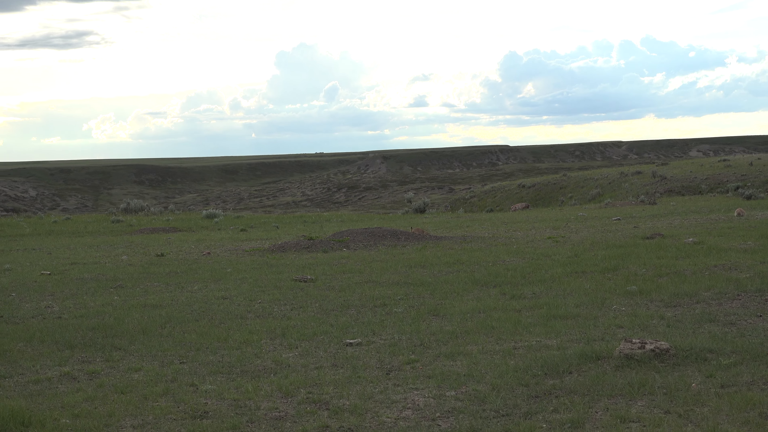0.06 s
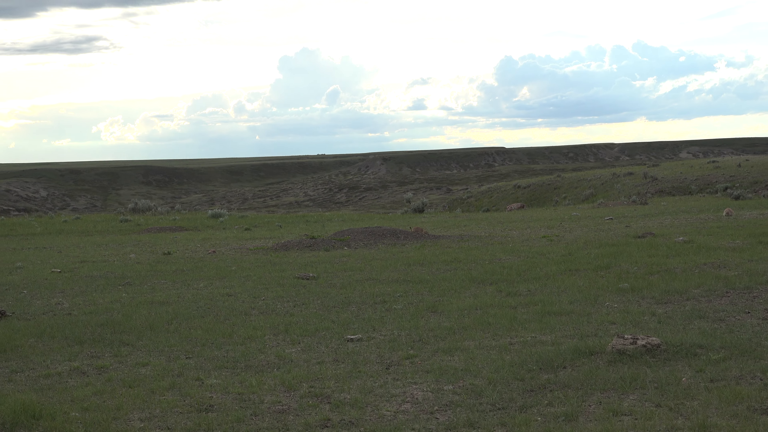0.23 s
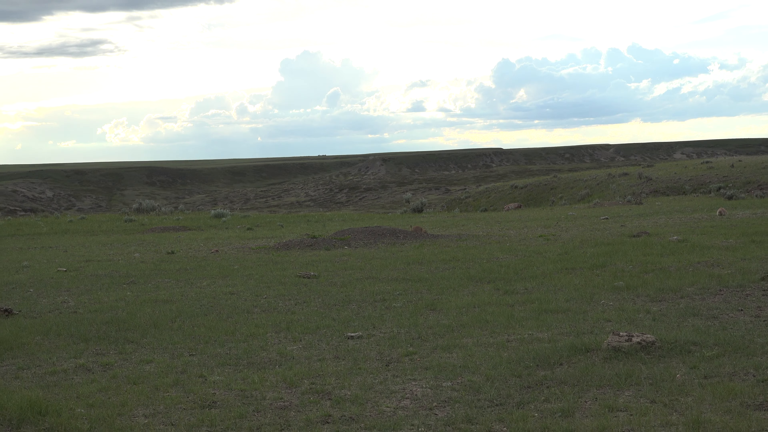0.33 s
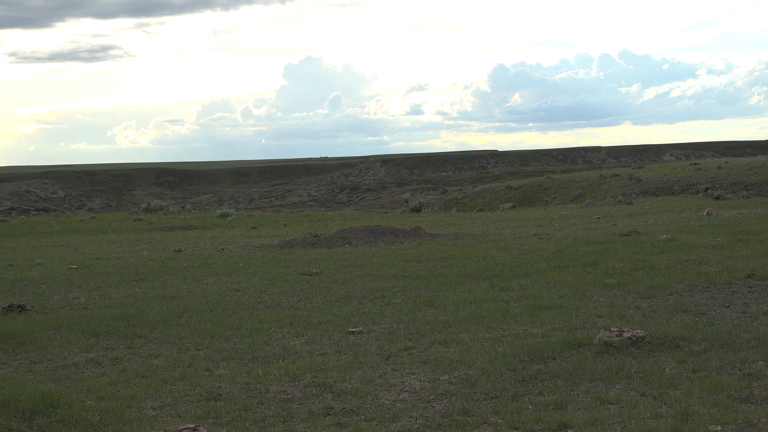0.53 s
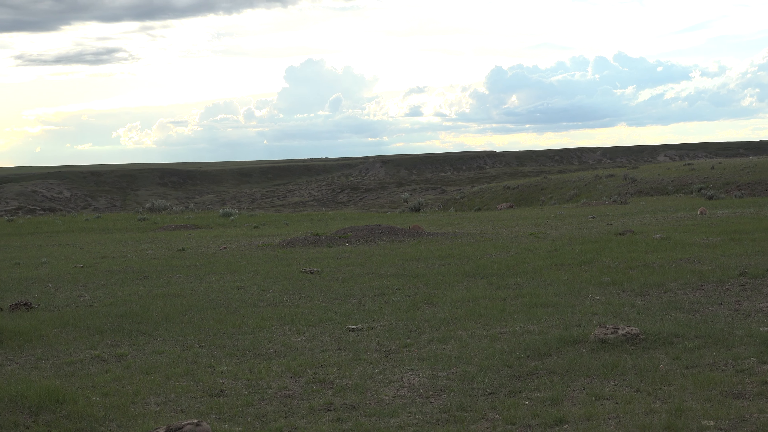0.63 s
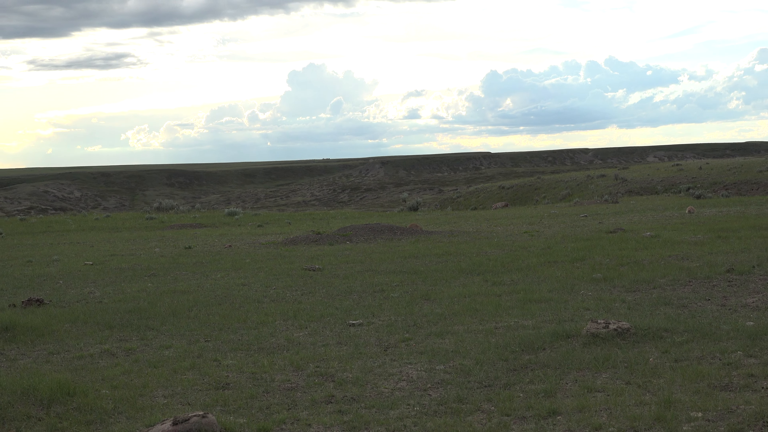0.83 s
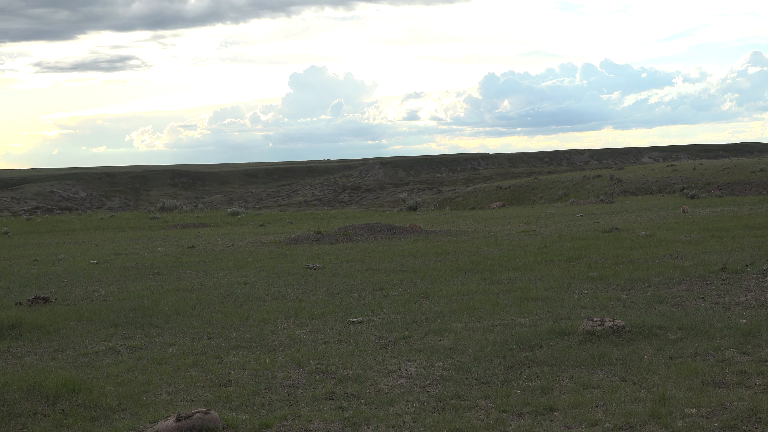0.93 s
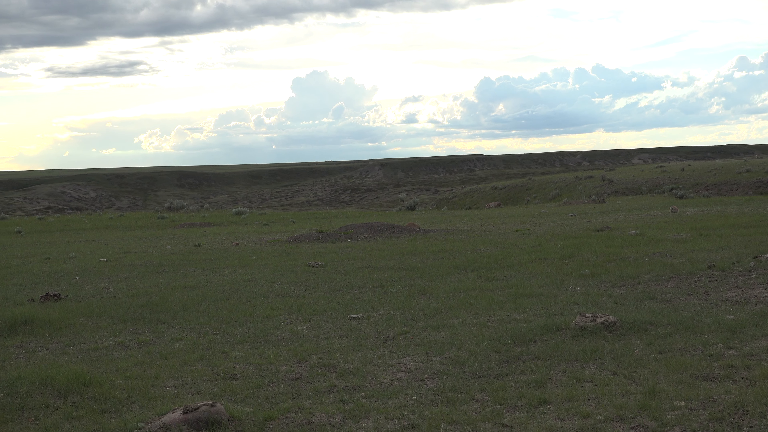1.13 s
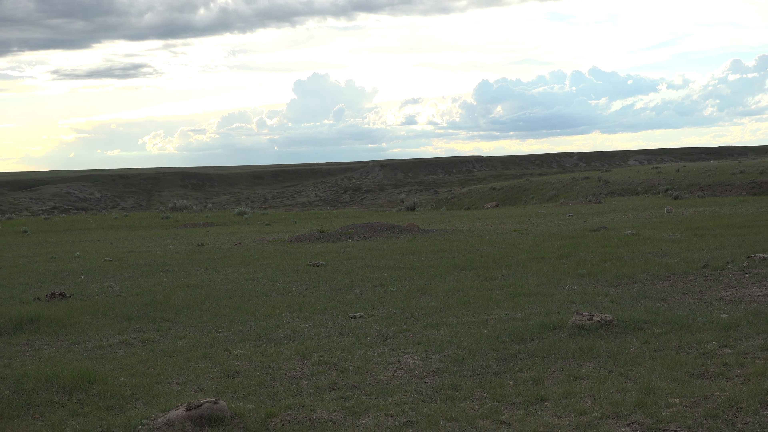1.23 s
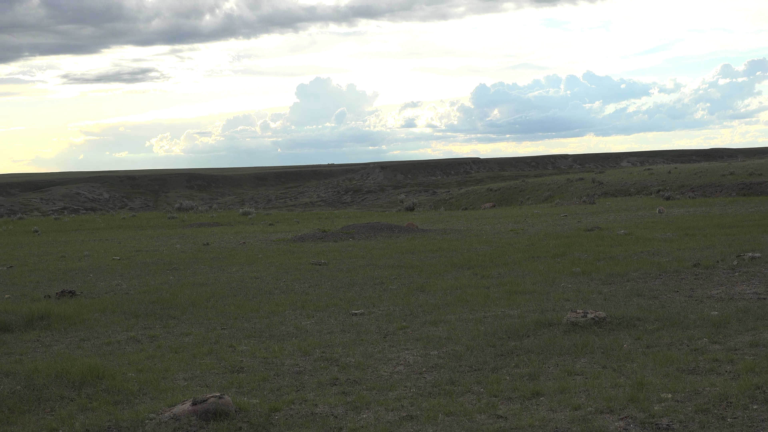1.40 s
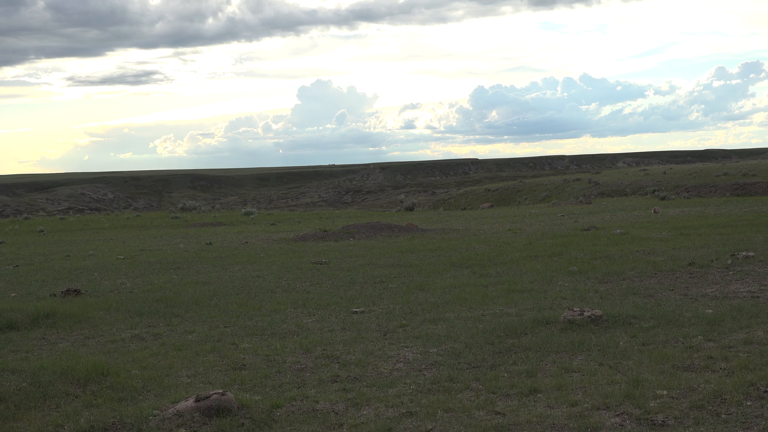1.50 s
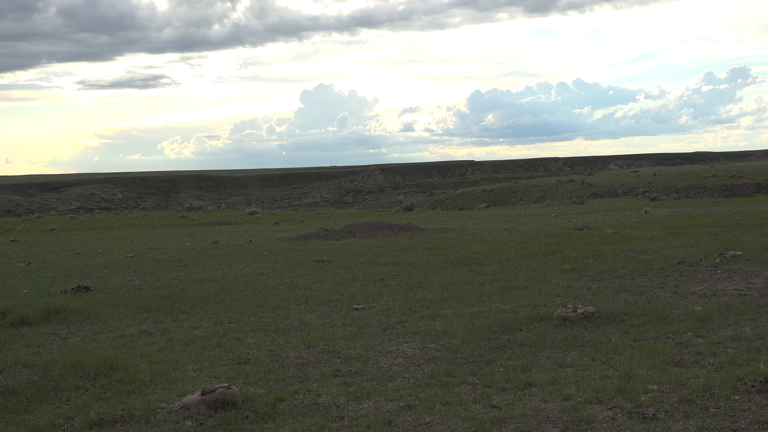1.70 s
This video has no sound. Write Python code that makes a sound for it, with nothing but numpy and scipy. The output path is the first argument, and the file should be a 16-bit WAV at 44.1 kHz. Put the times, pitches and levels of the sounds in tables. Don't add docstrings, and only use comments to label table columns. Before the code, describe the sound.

Three sharp whistly yips from a ground rodent on open grassland, the first loudest and the last softer, alternating with nearby cricket trills; faint distant peeps, steady hiss, and low wind thumps growing stronger near the end.

```python
import sys
import numpy as np
from scipy import signal
from scipy.fft import rfft, irfft
from scipy.io import wavfile
from scipy.ndimage import uniform_filter1d

SR = 44100
rng = np.random.default_rng(int(sys.argv[2]) if len(sys.argv) > 2 else 0)


def pcm_store(signal):
    levels = np.round(np.clip(np.atleast_2d(signal), -1, 1) * 32767)
    wavfile.write(sys.argv[1], SR, levels.astype(np.int16).T)


def natural_amplitude(level_db):
    exponent = np.asarray(level_db, float) / 20
    return 10 ** exponent


N = 77175

# frequency in Hz, level in dB per Hz.
HISS_COLOUR = [(320, -40), (550, -8), (747, -5), (1150, -5.5), (1610, -10), (1790, -9), (3970, -12.5),
               (4960, -10), (15300, -20)]
HISS_DB, AIR_HZ, AIR_DB_PER_KHZ = -67, 12500, -2.5

# frequency in Hz, level in dB per Hz.
RUMBLE_COLOUR = [(12, -62), (20, -42.5), (81, 1.5), (125, -26.5), (274, 5.5), (364, -26), (462, 1),
                 (560, -33), (700, -27), (910, -61.5), (1540, -120)]
RUMBLE_DB = -58.5

# frequency in Hz, shared part from 0 to 1.
LIKENESS = [(60, 1), (300, 1), (600, 0.75), (2000, 0.88), (5000, 0.89), (8000, 0.22), (11000, 0.33),
            (15000, 0.96)]

# frequency in Hz, width in Hz, level in dB.
HUMS = [(458.3, 41, -74.5), (1143, 49, -79.5), (1803, 71, -75), (4960, 250, -72), (7880, 300, -82.5),
        (13930, 6, -105.5)]

# time in seconds, level at both ports in dB, level at the left port alone in dB.
GUSTS = [(0, -46.5, -58), (.04, -67, -66.5), (.68, -62.5, -68.5), (0.714, -56, -43), (.75, -55, -58),
         (.79, -46.5, -63), (.86, -56.5, -58.5), (1.05, -73, -76), (1.089, -44, -63), (1.127, -62, -62),
         (1.155, -36, -31.5), (1.209, -35.5, -36.5), (1.28, -58, -38), (1.32, -67, -43.5),
         (1.344, -57, -33.5), (1.408, -34.5, -39), (1.46, -58, -40.5), (1.56, -62, -56)]
# frequency in Hz, level in dB per Hz.
THUMP_COLOUR = [(25, -41.5), (50, -20), (70, -5.5), (95, 4.5), (130, -12), (220, -15), (340, -38),
                (600, -71)]
# frequency in Hz, level in dB per Hz.
BUFFET_COLOUR = [(40, -41.5), (75, -10.5), (110, 2), (150, 0), (215, -3), (290, -17), (440, -28),
                 (600, -67)]
GUST_LIKENESS, GUST_EVENNESS = 0.94, 0.69

# start in seconds, length in seconds, start pitch in Hz, end pitch in Hz, level in dB.
FAR_CALLS = [
    (0.092, 0.051, 3550, 3690, -65.5),
    (0.165, 0.018, 3200, 3200, -67),
    (0.384, 0.16, 2110, 1878, -67),
    (.645, 0.08, 1170, 1142, -68.5),
    (0.694, .04, 2777, 2637, -67),
    (1.352, 0.022, 3300, 3200, -67),
]

# start in seconds, delays of the three later wing strokes in seconds, level in dB.
CHIRPS = [
    (.061, 0.028, .07, .11, -43.5),
    (0.465, 0.03, 0.071, 0.11, -44.5),
    (.879, .031, .07, .111, -44.5),
    (1.203, .033, .073, .114, -42.5),
    (1.58, .028, .07, .108, -43.5),
]
# start pitch in Hz, extra snap in Hz, level in dB, length in seconds.
STROKES = [
    (5040, 76, -4, 0.019),
    (5290, 20, 3.5, 0.024),
    (5319, 290, 3.5, 0.024),
    (5275, 305, 3, 0.022),
]
# time in seconds, level in dB.
FAINT_STROKES = [(.036, -65), (.348, -52.5), (.44, -72), (.858, -55), (1.145, -66), (1.182, -60), (1.56, -71)]
STROKE_SAG_HZ_PER_S, SNAP_S = 33400, 0.003
GROUND_S, GROUND_DB = 0.0056, -2.5
CRICKET_PAN_DB = -5.5

# time in seconds, pitch in Hz, effort in dB.
BARKS = [
    [(.2255, 1455, -53), (.228, 1582, -38.5), (.235, 1740, -29), (.243, 1839, -24), (.252, 1757, -25.5),
     (.262, 1667, -26), (.278, 1463, -36), (.285, 1310, -41.5), (.292, 1200, -76)],
    [(.7515, 1550, -63.5), (.754, 1623, -38.5), (.761, 1761, -32.5), (.768, 1834, -27.5),
     (.778, 1734, -27.5), (.8, 1580, -33.5), (.812, 1423, -38), (.819, 1285, -50), (.826, 1185, -55)],
    [(1.3825, 1520, -60.5), (1.385, 1632, -39.5), (1.392, 1733, -32.5), (1.398, 1792, -30),
     (1.406, 1757, -29), (1.421, 1588, -32), (1.436, 1460, -37), (1.442, 1303, -48.5), (1.448, 1240, -75)],
]
# first, third and fourth partial and half line in dB against the second,
# left-right balance in dB.
BARK_TONES = [
    (-15.5, -9, -43.5, -26, -4),
    (-16, -5, -16.5, -16.5, -3.5),
    (-20.5, -10, -24.5, -34.5, -3.5),
]
# frequency in Hz, level in dB.
THROAT = [(1800, -0.5), (2400, -9), (2900, -0.5), (3950, -2), (4250, -14), (4650, 0), (6000, -6.5),
          (6800, -2.5)]
TOP_HZ, TOP_DB_PER_KHZ = 6830, -29.5
FIRST_SAG_DB, HALF_SAG_DB = 65, 201
RASP_HZ, RASP_DEPTH, RASP_FADE_S, RASP_HOLD, RASP_SWING = 299.5, 0.79, 0.0079, 0.14, 0.53
BREATH_DB, JITTER = -23.5, 0.005

FLUTTER_S, FIRST_ECHO_DB, ECHO_STEP_DB = 0.01667, -9, -5
SCATTER_DB, SCATTER_T60_S = -13, 0.23
EDGE_HZ = 15600


def evened(x):
    return x / np.sqrt(np.mean(x ** 2) + 1e-20)


def read(points, hz):
    f, value = np.transpose(points)
    return np.interp(np.log(hz + 1), np.log(f + 1), value)


def add(mix, s, sound, pan_db):
    part = mix[:, round(s * SR):][:, :len(sound)]
    gains = natural_amplitude(np.array([[0.5], [-0.5]]) * pan_db)
    part += gains * sound[:part.shape[1]]


def likeness(hz):
    return read(LIKENESS, hz)


def noise(shape_db, same, patchy_db):
    frames, hz = N // 256 + 5, np.fft.rfftfreq(1024, 1 / SR)
    a, b, c, d, patches = rng.standard_normal((frames, 513, 5)).T
    patches = uniform_filter1d(patches, size=6, axis=0)
    patches = evened(uniform_filter1d(patches, size=10, axis=1))
    like = np.clip(same(hz), -1, 1)[:, None]
    left = a + 1j * b
    right = like * left + np.sqrt(1 - like ** 2) * (c + 1j * d)
    spectrum = np.array([left, right]) * natural_amplitude(shape_db(hz)[:, None] + patchy_db * patches)
    return evened(signal.istft(spectrum, nperseg=1024, noverlap=768)[1][:, :N])


def hiss():
    def colour(hz):
        air_loss = AIR_DB_PER_KHZ * np.maximum(hz - AIR_HZ, 0) / 1000
        return read(HISS_COLOUR, hz) - 30 * (hz < 500) + air_loss

    return natural_amplitude(HISS_DB) * noise(colour, likeness, patchy_db=1.0)


def rumble():
    def colour(hz):
        return read(RUMBLE_COLOUR, hz) - 40 * (hz > 700)

    gains = natural_amplitude(RUMBLE_DB + np.array([[0.8], [-0.8]]))
    return gains * noise(colour, likeness, patchy_db=4.5)


def hums():
    t, out = np.arange(N) / SR, np.zeros((2, N))
    for hz, width, db in HUMS:
        r = np.exp(-np.pi * width / SR)
        waver = signal.lfilter([1], [1, -2 * r, r * r], rng.standard_normal((4, N)))
        shared, own = waver[:2], waver[2:]
        turn = 2 * np.pi * hz * t
        ports = [shared + 0.37 * own, shared - 0.3 * own]
        hum = np.array([a * np.cos(turn) + b * np.sin(turn) for a, b in ports])
        out += natural_amplitude(db) * evened(hum)
    return out


def wind():
    s, both_db, left_db = np.transpose(GUSTS)
    t, out = np.arange(N) / SR, np.zeros((2, N))
    layers = [(THUMP_COLOUR, both_db, [[1], [1]]), (BUFFET_COLOUR, left_db, [[1], [0.22]])]
    for colour, db, ports in layers:
        x = noise(lambda hz: read(colour, hz), lambda hz: GUST_LIKENESS + 0 * hz, patchy_db=3.5)
        power = uniform_filter1d(x ** 2, size=1500, axis=1) + 0.01
        x = evened(x / power ** (GUST_EVENNESS / 2))
        out += x * ports * natural_amplitude(uniform_filter1d(np.interp(t, s, db), size=400))
    return out


def field(x):
    t = np.arange(SR // 3) / SR
    taps = np.zeros((2, len(t)))
    for k in range(1, 15):
        taps[:, round(k * FLUTTER_S * SR)] = natural_amplitude(FIRST_ECHO_DB + ECHO_STEP_DB * (k - 1))
    spray = rng.standard_normal((3, len(t))) * natural_amplitude(-60 * t / SCATTER_T60_S) * (t > 0.002)
    spray = spray[0] + 0.25 * spray[1:]
    taps += natural_amplitude(SCATTER_DB) * spray / np.linalg.norm(spray[0])
    return x + signal.fftconvolve(x, taps, axes=1)[:, :N]


def far_call(length, from_hz, to_hz, db):
    t = np.arange(0, length, 1 / SR)
    waver = 1 + 0.43 * evened(uniform_filter1d(rng.standard_normal(len(t)), size=300))
    hz = from_hz + (to_hz - from_hz) * t / length
    swell = np.sin(np.pi * t / length) ** 0.76
    return natural_amplitude(db) * waver * swell * np.sin(2 * np.pi * np.cumsum(hz) / SR)


def wing_stroke(top_hz, snap_hz, db, length):
    t = np.arange(0, length, 1 / SR)
    snap = snap_hz * rng.uniform(0.52, 1.11) * np.exp(-t / SNAP_S)
    hz = top_hz + 25 * rng.standard_normal() + snap - STROKE_SAG_HZ_PER_S * t
    swell = np.sin(np.pi * (t / length) ** 0.65) ** 1.45
    tone = natural_amplitude(db) * swell * np.sin(2 * np.pi * np.cumsum(hz) / SR)
    lag = np.zeros(round(GROUND_S * SR))
    return np.r_[tone, lag] + natural_amplitude(GROUND_DB) * np.r_[lag, tone]


def cricket(calls):
    for start, *delays, db in CHIRPS:
        times = start + np.r_[0, delays]
        for s, (top_hz, snap_hz, rel_db, length) in zip(times, STROKES):
            add(calls, s, wing_stroke(top_hz, snap_hz, db + rel_db, length), CRICKET_PAN_DB)
    for s, db in FAINT_STROKES:
        add(calls, s, wing_stroke(5250, 0, db, 0.0083), CRICKET_PAN_DB)


def bark(points, tone):
    s, pitch, effort = np.transpose(points)
    first_db, third_db, fourth_db, half_db, _ = tone
    t = np.arange(s[0], s[-1], 1 / SR)

    def wobble(size):
        return evened(np.convolve(rng.standard_normal(len(t)), np.hanning(size), "same"))

    hz = uniform_filter1d(np.interp(t, s, pitch), size=130) * (1 + JITTER * wobble(160))
    sag = 1 - hz / hz.max()
    depth = RASP_HOLD + RASP_DEPTH * np.exp(-(t - s[0]) / RASP_FADE_S)
    flap = 2 * np.pi * np.cumsum(RASP_HZ * (1 + 0.11 * wobble(300))) / SR
    turn = 2 * np.pi * np.cumsum(hz) / SR + RASP_SWING * depth * np.sin(flap)
    partials = [(1, first_db - FIRST_SAG_DB * sag), (2, 0.0026), (3, third_db), (3.96, fourth_db),
                (1.5, half_db - HALF_SAG_DB * sag)]
    voice = sum(natural_amplitude(db) * np.sin(k * turn + k * k) for k, db in partials)
    voice *= 1 + depth * np.cos(flap) + natural_amplitude(BREATH_DB) * wobble(50)
    voice *= natural_amplitude(uniform_filter1d(np.interp(t, s, effort), size=40))

    bins = np.fft.rfftfreq(8192, 1 / SR)
    throat = read(THROAT, bins) + TOP_DB_PER_KHZ * np.maximum(bins - TOP_HZ, 0) / 1000
    throat = natural_amplitude(uniform_filter1d(throat, size=15))
    return np.sqrt(2) * irfft(rfft(voice, 8192) * throat)[:len(t)]


def scene():
    calls = np.zeros((2, N))
    for s, *call in FAR_CALLS:
        add(calls, s, far_call(*call), -3)
    cricket(calls)
    for points, tone in zip(BARKS, BARK_TONES):
        add(calls, points[0][0], bark(points, tone), tone[-1])
    return hiss() + rumble() + hums() + wind() + field(calls)


def band_limit(x):
    return signal.sosfilt(signal.butter(12, 15690, fs=SR, output="sos"), x)


def record(dry):
    bass_cut = signal.butter(2, 55, "high", fs=SR, output="sos")
    cut = signal.sosfilt(bass_cut, dry)
    edge = signal.firwin(511, EDGE_HZ, window=("kaiser", 9), fs=SR)
    mix = signal.oaconvolve(cut, edge[None], "same")
    return band_limit(mix)


dry = scene()
out = record(dry)
pcm_store(out)
```